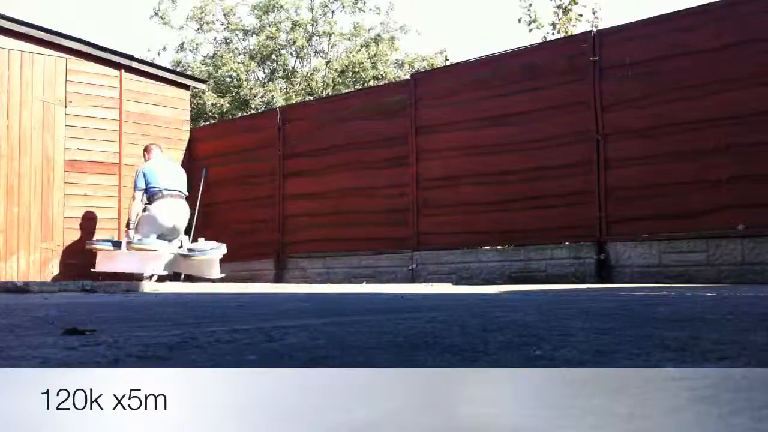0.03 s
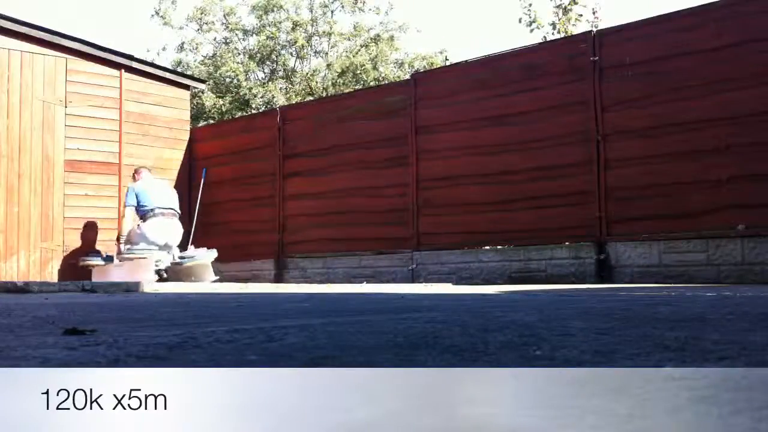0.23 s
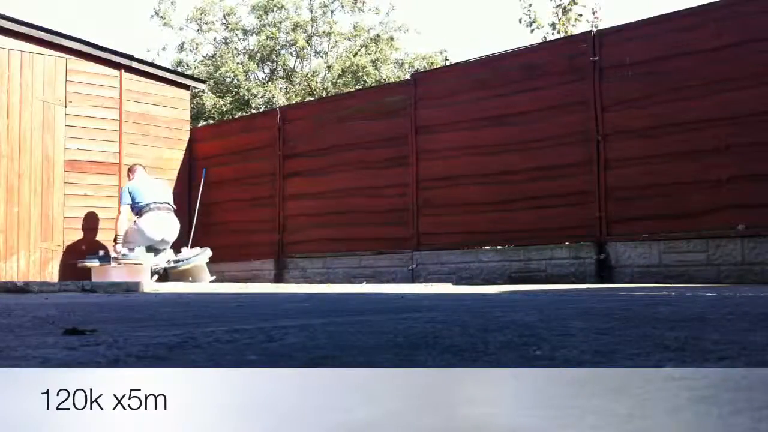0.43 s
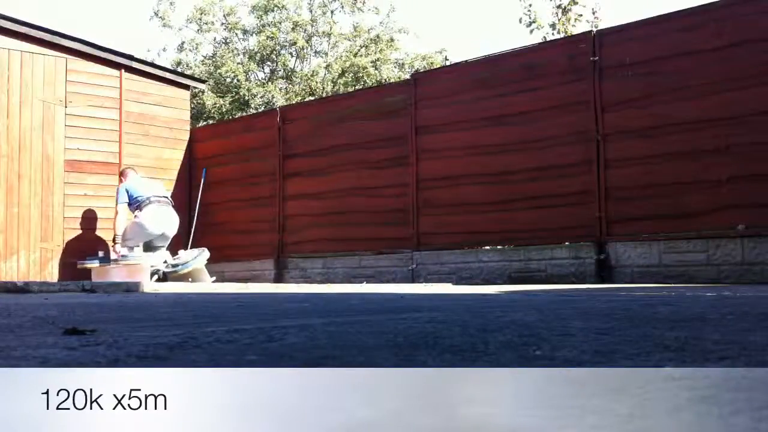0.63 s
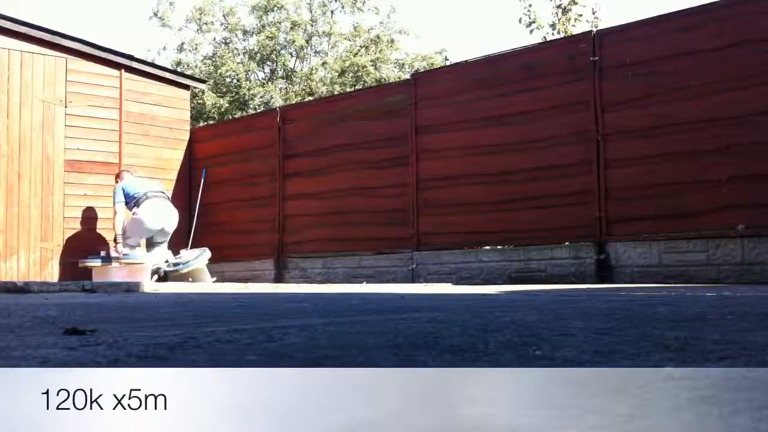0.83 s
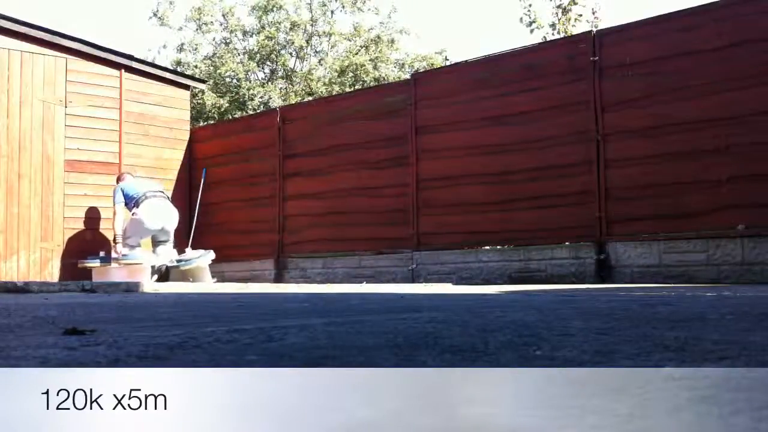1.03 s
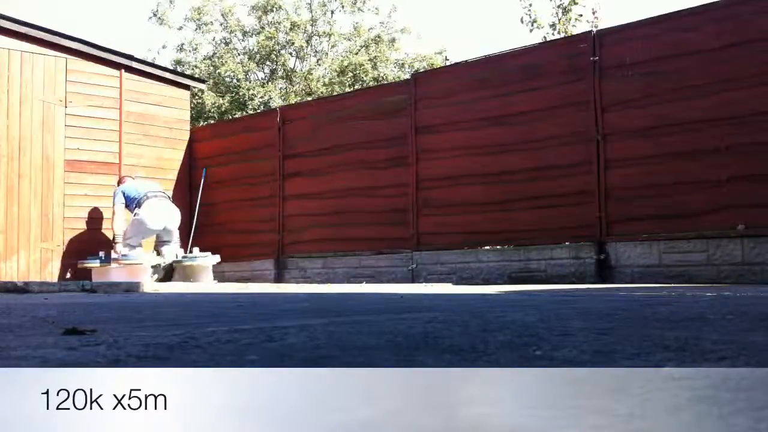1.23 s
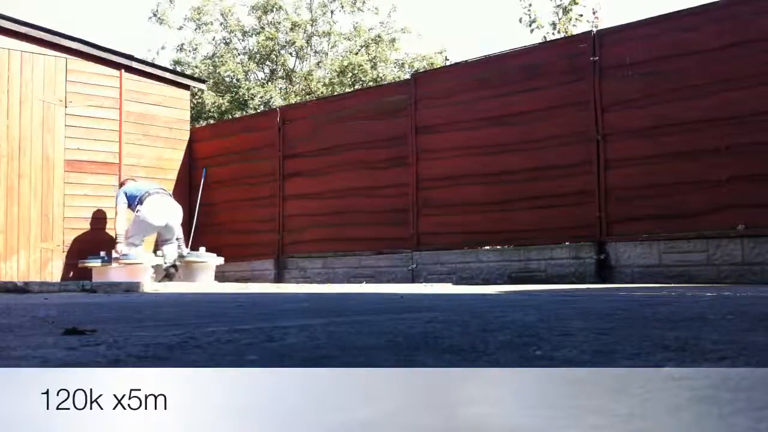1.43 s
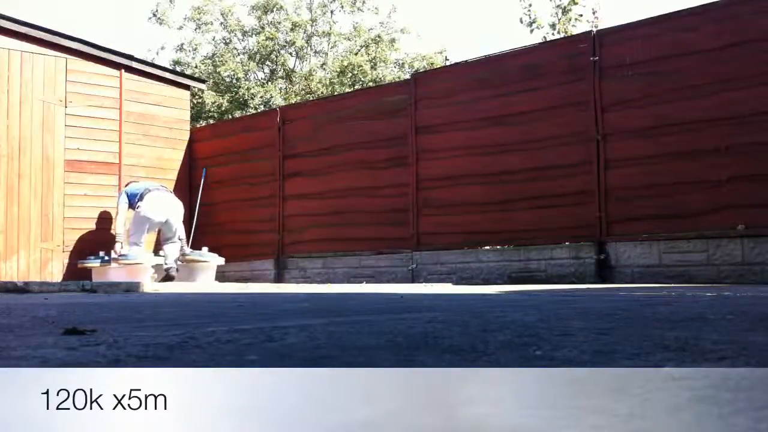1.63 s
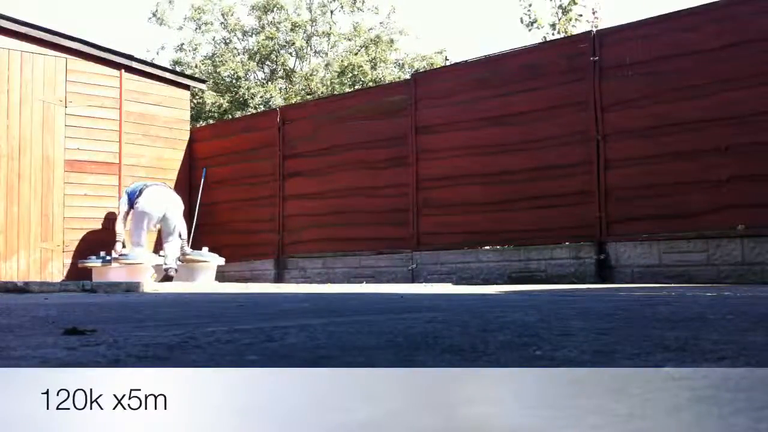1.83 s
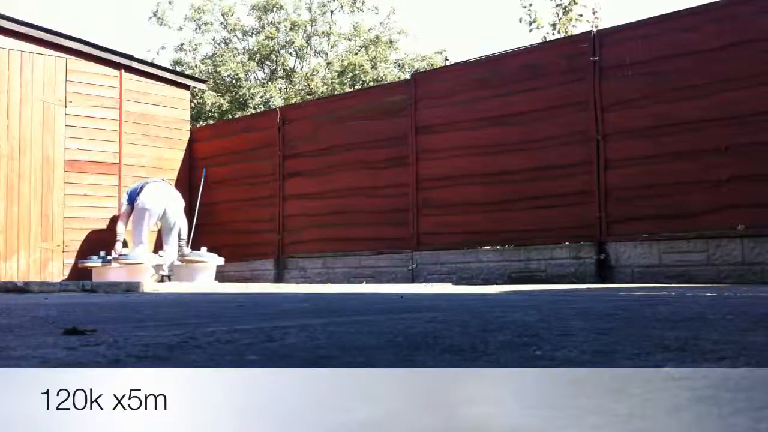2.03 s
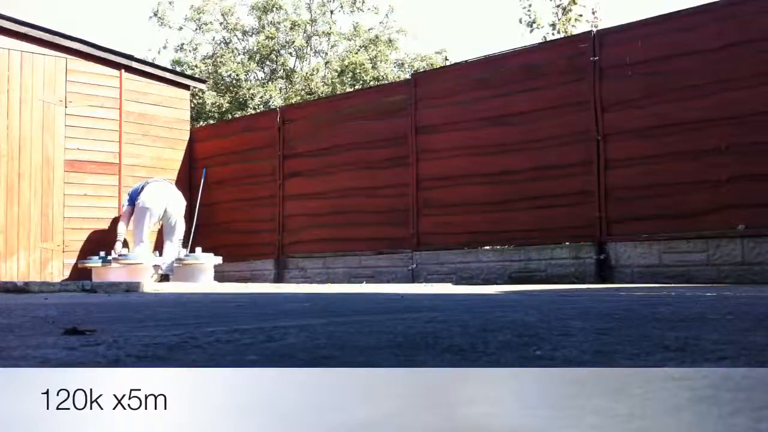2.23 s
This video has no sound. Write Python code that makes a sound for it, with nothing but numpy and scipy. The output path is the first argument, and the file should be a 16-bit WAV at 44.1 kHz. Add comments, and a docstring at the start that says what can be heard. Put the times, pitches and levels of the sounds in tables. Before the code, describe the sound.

Two weight-loaded steel frames drop with a loud ringing clang, then rock and settle outdoors.

```python
"""A faint rattle of carried weight plates and a shoe scuff come first; then two loaded steel frames
crash onto the paving of a fenced yard. They bounce and rock to rest, each impact exciting damped modes
of frames and discs and noisy ringing of the stacked plates. The loudest peaks overload the microphone.
Dull knocks, shuffling shoes and one click follow, over quiet outdoor air and a faint bird."""
import sys
import numpy as np
from scipy import signal
from scipy.fft import rfft, irfft, next_fast_len
from scipy.io import wavfile
from scipy.ndimage import map_coordinates

SR = 44100
rng = np.random.default_rng(int(sys.argv[2]) if len(sys.argv) > 2 else 0)


def generate_wav(sig):
    """Save sig (samples, or channels by samples) to the path in sys.argv[1] as 16-bit PCM at SR."""
    pcm = np.round(np.clip(np.atleast_2d(sig).T, -1, 1) * 32767).astype(np.int16)
    wavfile.write(sys.argv[1], SR, pcm)


N = 101429


def amp(db):
    """Amplitude ratio of a level in decibels."""
    return 10 ** (np.asarray(db) / 20)


def unit(x):
    """Normalisation to rms 1."""
    return x / np.sqrt(np.mean(x ** 2) + 1e-20)


def since(onset):
    """Seconds since the onset, zero before it."""
    return np.maximum(np.arange(N) / SR - onset, 0)


def along(points, hz):
    """Interpolation of (f, value) points on a logarithmic frequency axis."""
    f, value = np.transpose(points)
    return np.interp(np.log(hz + 1), np.log(f + 1), value)


def filtered(x, response):
    """Linear filtering: the spectrum is multiplied by a frequency response."""
    size = next_fast_len(N + SR // 2)
    return irfft(rfft(x, size) * response(np.fft.rfftfreq(size, 1 / SR)), size)[:N]


def noise(spectrum):
    """Coloured noise of rms 1; the spectrum levels set only its shape."""
    return unit(filtered(rng.standard_normal(N), lambda hz: amp(along(spectrum, hz))))


def wobble(rate):
    """Smooth random modulation through rate knots a second."""
    return map_coordinates(rng.standard_normal(size=2000), [since(0) * rate], mode="wrap")


def strike(onset, t60, hold=0, attack_s=0.0028):
    """Transient envelope: quick rise, hold, then exponential decay by 60 dB in t60."""
    start = int(onset * SR)
    t = np.arange(min(N - start, int((hold + 2 * t60) * SR))) / SR
    rise = 1 - np.exp(-t / attack_s)
    decay = np.exp(-np.log(1000) * np.maximum(t - hold, 0) / t60)
    return np.pad(rise * decay, (start, N - start - len(t)))


def energy_sum(blows, t60):
    """Incoherent addition: amplitude envelope of (t, level) blows whose energies add."""
    return np.sqrt(sum((amp(db) * strike(onset, t60)) ** 2 for onset, db in blows))


def bursts(spectrum, t60, blows):
    """Modal overlap: dense resonances, struck by (t, level) blows, decay like a band of noise."""
    return noise(spectrum) * energy_sum(blows, t60)


def drift():
    """Random phase modulation, in radians, that makes a tone waver."""
    return 0.38 * wobble(rate=22)


def ring(modes, blows, beat_db=2.2):
    """Modal superposition: struck (f, level, T60) modes beat and drift as the plates shift."""
    out = np.zeros(N)
    for hz, db, t60 in modes:
        phase = 2 * np.pi * (hz * since(0) + rng.random()) + drift()
        out += amp(db + beat_db * wobble(rate=22)) * energy_sum(blows, t60) * np.sin(phase)
    return out


# Spectrum of the outdoor air: f/Hz, level/dB
AIR_SPECTRUM = [(18, -76.5), (30, -44), (118, -18), (199, -5), (273, -4.5), (461, -9.5), (540, -5.5),
                (584, -8.5), (1590, -15.5), (1760, -19.5), (2010, -24.5), (3870, -31), (16000, -45)]
# Background level, ducked after the crash and recovering as with automatic gain: t/s, level/dB
BACKGROUND_GAIN = [(0, -41.5), (.75, -62), (1.0, -53), (1.2, -55), (1.45, -51.5), (1.7, -51.5), (2.0, -50),
                   (2.3, -51.5)]


def air():
    """Ambient noise: a fixed spectrum under a gain curve that dips and slowly recovers."""
    return noise(AIR_SPECTRUM) * amp(np.interp(since(0), *np.transpose(BACKGROUND_GAIN)))


# Bird whistles: t/s, duration/s, start f/Hz, end f/Hz, level/dB
WHISTLES = [(0.868, 0.155, 2680, 2660, -70), (1.388, 0.13, 2900, 2750, -68)]


def bird():
    """Linear frequency sweep: each distant whistle is a pure tone that falls slightly."""
    out = np.zeros(N)
    for onset, length, start_hz, end_hz, db in WHISTLES:
        progress = np.clip(since(onset) / length, 0, 1)
        hz = start_hz + (end_hz - start_hz) * progress
        out += amp(db) * np.sin(np.pi * progress) * np.sin(2 * np.pi * np.cumsum(hz) / SR)
    return out


# Reverberation time of the yard: f/Hz, T60/s
YARD_T60 = [(100, 0.41), (250, 0.51), (1000, 0.56), (2500, 0.43), (6000, 0.23), (14000, 0.27)]


def yard(x, delay_s=0.018):
    """Reverberation: fence and shed return a delayed, diffuse tail whose treble dies first."""
    hz, t, bands = signal.stft(rng.standard_normal(SR), SR, nperseg=256)
    decay = np.exp(-np.log(1000) * t / along(YARD_T60, hz)[:, None])
    tail = signal.istft(bands * decay, SR)[1]
    delayed = np.pad(x, (int(delay_s * SR), 0))
    return signal.fftconvolve(delayed, tail / np.linalg.norm(tail))[:N]


# Shoe scuffs: t/s, level/dB, hold/s, peak f/Hz, slope to either side/(dB per octave)
SCUFFS = [(0.085, -57.5, 0.018, 5070, 9), (1.094, -69.5, 0.12, 4000, 15.5),
          (1.221, -68.5, 0.065, 6870, 3.5), (1.491, -67.5, 0.207, 3680, 7.5), (1.865, -63, 0.073, 2330, 25),
          (1.925, -67.5, .1, 3000, 5.5), (2.202, -65.5, 0.075, 5100, 12.5)]


def scuffs():
    """Friction noise: shoes rub on grit, each time with a different spectral peak."""
    out = np.zeros(N)
    for onset, db, hold, peak_hz, slope in SCUFFS:
        white = rng.standard_normal(N)
        grit = filtered(white, lambda hz: amp(-slope * np.abs(np.log2((hz + 1) / peak_hz))))
        out += amp(db) * unit(grit) * strike(onset, t60=0.043, hold=hold)
    return out


# Bumps of shuffling feet: t/s, level/dB, duration/s, f/Hz
FOOT_BUMPS = [(1.807, -46, 0.13, 205), (1.935, -48.5, 0.053, 187), (2.007, -48.5, 0.031, 361)]


def foot_bumps():
    """Soft contact gives a narrow spectrum: each bump is a low tone in a half-sine swell."""
    out = np.zeros(N)
    for onset, db, length, hz in FOOT_BUMPS:
        swell = np.sin(np.pi * np.clip(since(onset) / length, 0, 1))
        out += amp(db) * swell * np.sin(2 * np.pi * hz * since(onset) + drift())
    return out


# Spectrum of the carried plates: f/Hz, level/dB
RATTLE_SPECTRUM = [(35, -65), (60, -53), (204, -1), (408, -6), (605, 2), (1030, -1.5), (1210, -19),
                   (1490, -5), (2110, -28), (15000, -52)]
PLATES_T60_S = 0.34


def rattle(db=-45.5, release_s=0.13):
    """Forced vibration, then free decay: the plates rattle softly until they are let go."""
    decay = np.exp(-np.log(1000) * since(release_s) / PLATES_T60_S)
    return amp(db) * noise(RATTLE_SPECTRUM) * decay


# Tap of loose metal: t/s, level/dB, T60/s
CLICKS = [(2.127, -42.5, .07)]
# Its spectrum: f/Hz, level/dB
CLICK_SPECTRUM = [(300, -14), (700, -6), (1300, 0), (2000, -2.5), (3700, -8), (6000, -21), (12000, -26.5)]


def click():
    """Brief contact gives a broad spectrum: something small and hard taps the load once."""
    return sum(bursts(CLICK_SPECTRUM, t60, [(onset, db)]) for onset, db, t60 in CLICKS)


# Knocks of shifting plates: t/s, level/dB, hold/s, cutoff f/Hz
KNOCKS = [(.268, -13, 0.02, 1100), (.521, -21, .02, 1050), (.676, -19.5, 0.022, 1050),
          (0.994, -34, 0.022, 1050), (1.061, -46, 0.025, 1050), (1.491, -33, 0.021, 1800)]
# Noise spectrum and partials of a knock, each: f/Hz, level/dB
KNOCK_SPECTRUM = [(80, -59), (250, -3), (600, -2), (780, -1.5), (900, 9.5), (1050, -3.5), (1400, -4.5),
                  (1800, -25), (4000, -58), (12000, -56)]
KNOCK_PARTIALS = [(835, -9), (900, -3.5), (965, -10), (1140, -10), (1385, -9.5)]


def knocks(noise_db=-7, clunk_db=-6.5):
    """Damped vibration: a plate judders and clunks, each dull knock low-passed at its own cutoff."""
    out = np.zeros(N)
    for onset, db, hold, cutoff_hz in KNOCKS:
        tones = sum(amp(level) * np.sin(2 * np.pi * (hz * since(onset) + rng.random()))
                    for hz, level in KNOCK_PARTIALS)
        judder = (tones + amp(noise_db) * noise(KNOCK_SPECTRUM)) * strike(onset, t60=0.03, hold=hold)
        clunk = bursts(KNOCK_SPECTRUM, t60=0.5, blows=[(onset, clunk_db)])
        out += amp(db) * filtered(judder + clunk, lambda hz: 1 / np.sqrt(1 + (hz / cutoff_hz) ** 10))
    return out


# Thuds of the two main landings: t/s, level/dB
THUDS = [(0.223, -29), (0.31, -28)]
# Spectrum of the rumble in a thud: f/Hz, level/dB
RUMBLE_SPECTRUM = [(25, -9.5), (60, -8), (130, 0.5), (200, -3.5), (400, -29)]


def thuds(hz=118, rumble_db=-7):
    """Damped oscillation: a short low tone and a little rumble, like the thud of clipping distortion."""
    rumble = amp(rumble_db) * noise(RUMBLE_SPECTRUM)
    out = np.zeros(N)
    for onset, db in THUDS:
        tone = np.sin(2 * np.pi * hz * since(onset))
        out += amp(db) * (tone + rumble) * strike(onset, t60=0.04, hold=0.022)
    return out


# Booms of a frame landing flat: t/s, level/dB, hold/s, f/Hz
BOOMS = [(0.217, -18, 0.036, 299.4), (.314, -11.5, 0.029, 414.5), (0.511, -19, 0.022, 307)]


def booms(overtone_ratio=1.4, overtone_db=-7):
    """Inharmonic vibration: a flat landing excites two quickly damped, hollow partials."""
    out = np.zeros(N)
    for onset, db, hold, hz in BOOMS:
        phase = 2 * np.pi * hz * since(onset)
        partials = np.sin(phase) + amp(overtone_db) * np.sin(overtone_ratio * phase)
        out += amp(db) * partials * strike(onset, t60=0.041, hold=hold)
    return out


# Modes of the steel frames, one list each: f/Hz, level/dB, T60/s
FRAME_HZ = [251, 305, 530, 575, 890, 920, 955, 1175, 1287, 1405, 1701, 2050]
FRAME_DB = [-13.5, -12, -6, 0.5, -4, -7, -3.5, -20.5, -19, -11.5, -23.5, -20]
FRAME_T60_S = [1, 0.97, 0.84, .6, 0.49, 0.56, 0.7, .65, 0.41, 0.81, 0.93, 0.46]
# Modes of the weight discs, one list each: f/Hz, level/dB, T60/s
DISC_HZ = [408, 722, 854, 1000, 1090, 1247, 1369, 1549]
DISC_DB = [-11, 0, -3.5, -5, -6.5, -2.5, -4.5, -15.5]
DISC_T60_S = [0.79, 0.53, 0.64, .6, .55, 0.31, 0.25, 0.99]
# Modes of the plate edges: f/Hz, level/dB, T60/s
EDGE_MODES = [(2750, -12, .16), (4624, -8, .06), (5800, -14, .08), (7450, -17, .06)]


def steel(blows, knock_coupling_db=-21):
    """Free vibration: frames, discs and edges ring after each blow; knocks barely stir the frames."""
    onsets, frame_db, disc_db, _, clash_db, _ = np.transpose(blows)
    stirs = [(onset, db + knock_coupling_db) for onset, db, _, _ in KNOCKS]
    frames = ring(zip(FRAME_HZ, FRAME_DB, FRAME_T60_S), list(zip(onsets, frame_db)) + stirs)
    discs = ring(zip(DISC_HZ, DISC_DB, DISC_T60_S), list(zip(onsets, disc_db)))
    edges = ring(EDGE_MODES, list(zip(onsets, clash_db)))
    return frames + discs + edges


def drone(onset=0.64, db=-29.5):
    """Resonance: the lowest frame mode sounds on while the load rocks to rest."""
    tone = np.sin(2 * np.pi * FRAME_HZ[0] * since(onset) + drift())
    return amp(db) * tone * strike(onset, t60=0.42, hold=0.1)


# Spectrum of metal clashing on metal: f/Hz, level/dB
CLASH_SPECTRUM = [(500, -19), (2000, -1), (2800, -11.5), (3600, -5.5), (4600, 4), (6200, -3), (9000, -8),
                  (11500, -18), (12100, -12.5), (13300, -16.5), (16000, -28.5)]


def jangle(ripple_db=3.5, spacing_hz=75, grain_db=2.2):
    """Contact chatter: dense high resonances ripple the spectrum, tiny uneven contacts the level."""
    ripple = rng.standard_normal(size=400)
    metal = filtered(noise(CLASH_SPECTRUM),
                     lambda hz: amp(ripple_db * map_coordinates(ripple, [hz / spacing_hz], mode="wrap")))
    return unit(metal * amp(grain_db * wobble(rate=500)))


# Blows of the loaded frames: t/s, then level/dB of frame ring, disc ring, plates, clash, thump
BLOWS = [(.223, -26, -12.5, -7, -27.5, -25), (0.233, -15, -15, -16.5, -17.5, -46),
         (0.268, -12.5, -33, -21, -28, -45), (0.296, -18, -11.5, -10, -28, -38.5),
         (0.321, -16.5, -11, -15, -25, -11), (0.368, -29, -17, -12.5, -53, -34),
         (0.393, -36.5, -19.5, -17.5, -51, -37), (0.441, -34.5, -37, -18, -50.5, -32),
         (0.515, -18.5, -24.5, -17, -45, -26), (0.536, -29.5, -22.5, -25.5, -48, -39),
         (0.596, -21.5, -36, -22.5, -50.5, -22), (0.643, -28.5, -29, -38.5, -66, -36),
         (0.674, -35, -47, -35.5, -59, -34.5), (0.804, -48, -41, -40, -64, -59),
         (0.887, -44.5, -60, -42.5, -92, -36)]
# Spectra of the stacked plates and of the ground's thump, each: f/Hz, level/dB
PLATES_SPECTRUM = [(130, -27.5), (220, -7), (320, -9), (520, 1), (660, -3.5), (930, 8), (1040, -9),
                   (1150, 1.5), (1450, -2.5), (1620, -15), (1750, -16), (2700, -22), (3600, -31),
                   (9000, -71)]
THUMP_SPECTRUM = [(50, -46), (100, -21), (140, -8), (200, 2.5), (300, 4.5), (450, 3.5), (700, 1),
                  (1500, -74.5)]


def crash(blows, tail_db=-8.5, tail_cutoff_hz=7000):
    """Impact excitation: every blow clashes the plate edges, shakes the stack and thumps the ground."""
    onsets, _, _, plates_db, clash_db, thump_db = np.transpose(blows)
    tail = jangle() * energy_sum(zip(onsets, clash_db + tail_db), t60=0.6)
    tail = filtered(tail, lambda hz: 1 / (1 + (hz / tail_cutoff_hz) ** 6))
    clash = jangle() * energy_sum(zip(onsets, clash_db), t60=0.11)
    plates = bursts(PLATES_SPECTRUM, PLATES_T60_S, zip(onsets, plates_db))
    thump = bursts(THUMP_SPECTRUM, t60=0.17, blows=zip(onsets, thump_db))
    return clash + tail + plates + thump


def low_cut(x, cutoff_hz=143):
    """Radiation efficiency as a high-pass filter: the metal gives off little deep bass."""
    return signal.sosfilt(signal.butter(6, cutoff_hz, "highpass", fs=SR, output="sos"), x)


def scene(yard_db=-6):
    """Superposition of all sources in one channel; only crash and scuffs reverberate."""
    direct = crash(BLOWS) + scuffs()
    metal = steel(BLOWS) + drone() + booms() + knocks() + click()
    radiated = low_cut(direct + amp(yard_db) * yard(direct) + metal)
    return (radiated + thuds() + foot_bumps() + rattle() + bird() + air())[None]


def record(dry, ceiling=0.99, band_limit_hz=16100):
    """Overload: the loudest peaks are clipped, then everything above the band limit is removed."""
    clipped = np.clip(dry[0], -ceiling, ceiling)
    return filtered(clipped, lambda hz: hz < band_limit_hz)[None]


dry = scene()
out = record(dry)
generate_wav(out)
```